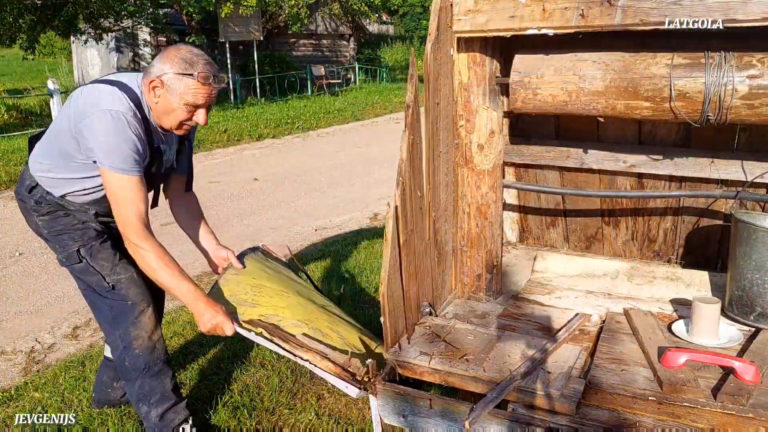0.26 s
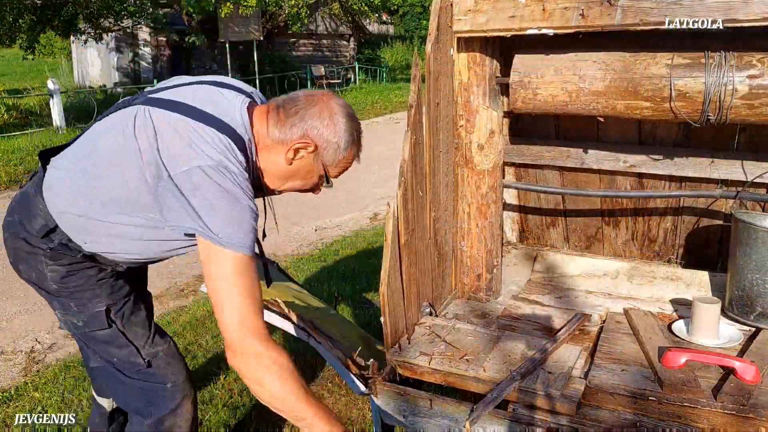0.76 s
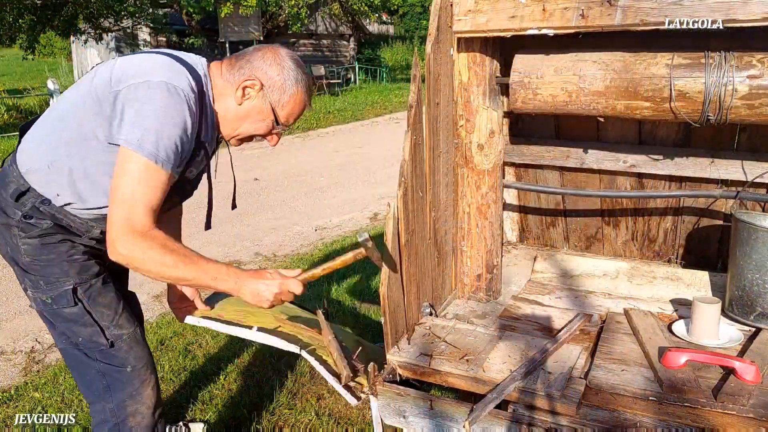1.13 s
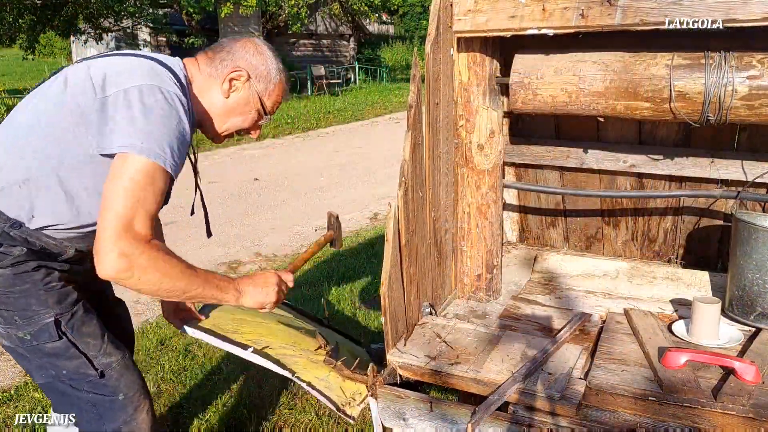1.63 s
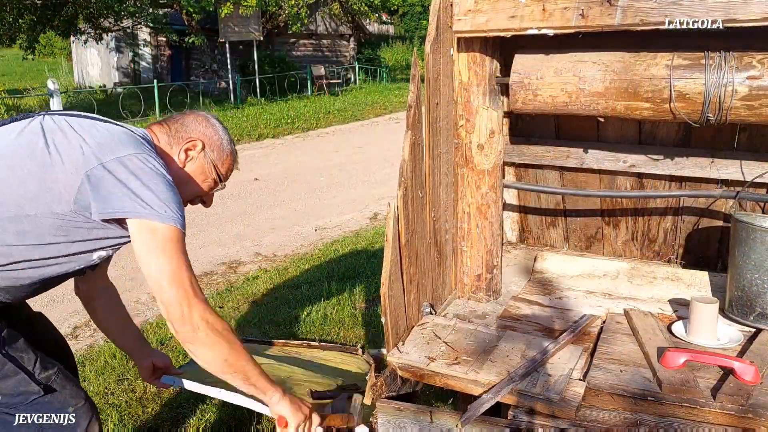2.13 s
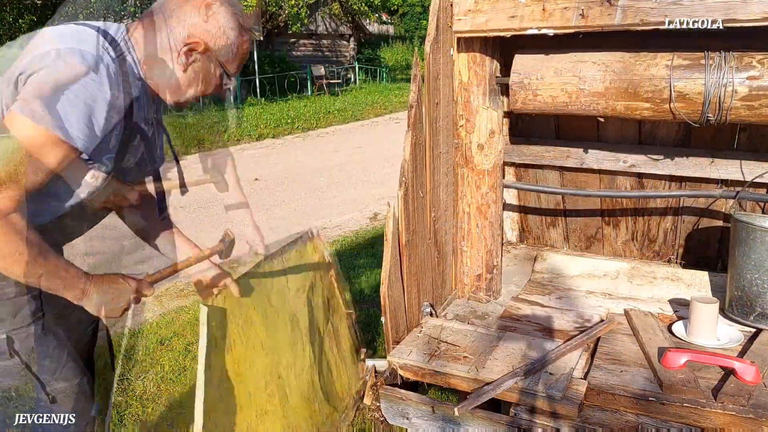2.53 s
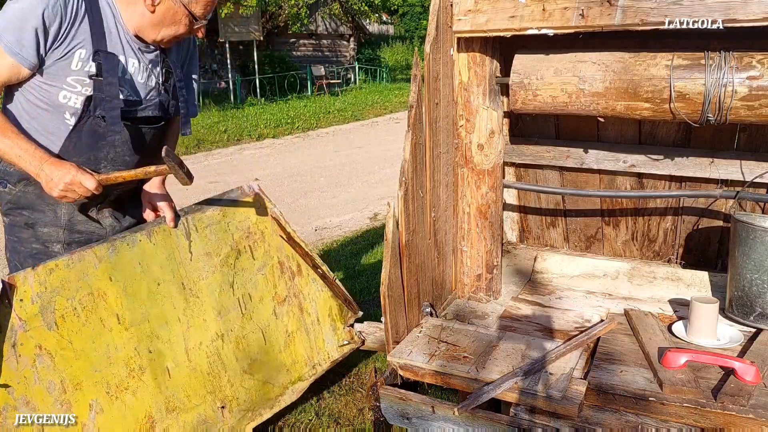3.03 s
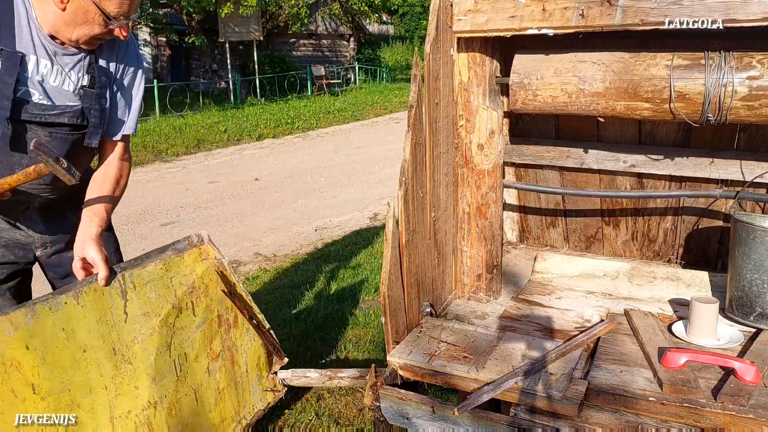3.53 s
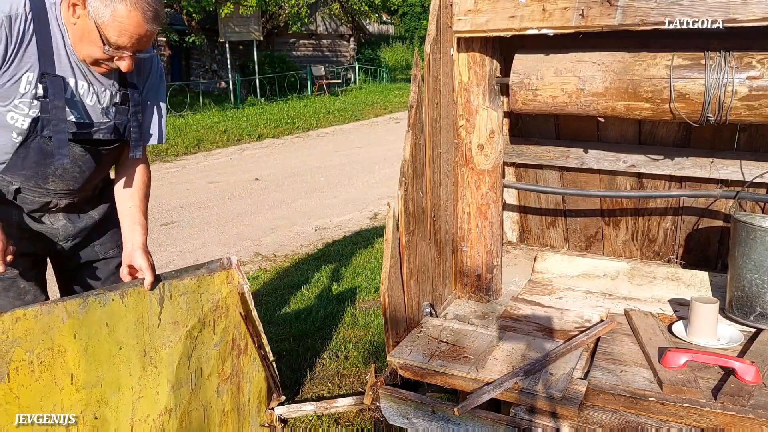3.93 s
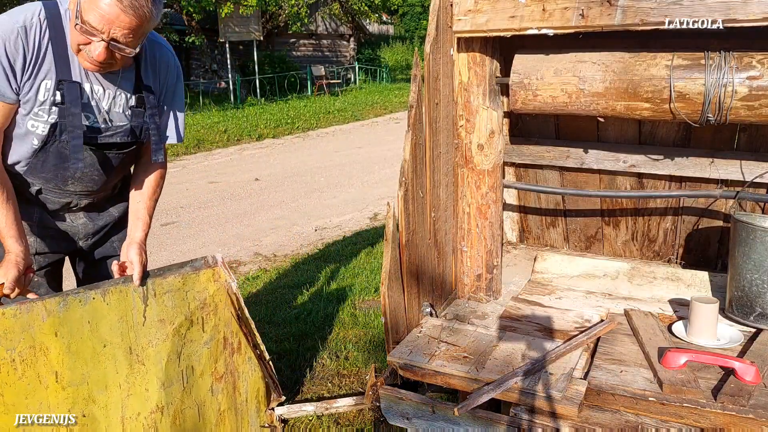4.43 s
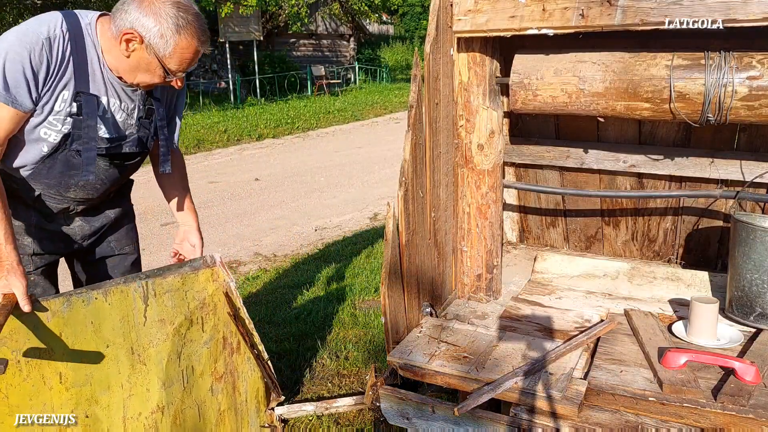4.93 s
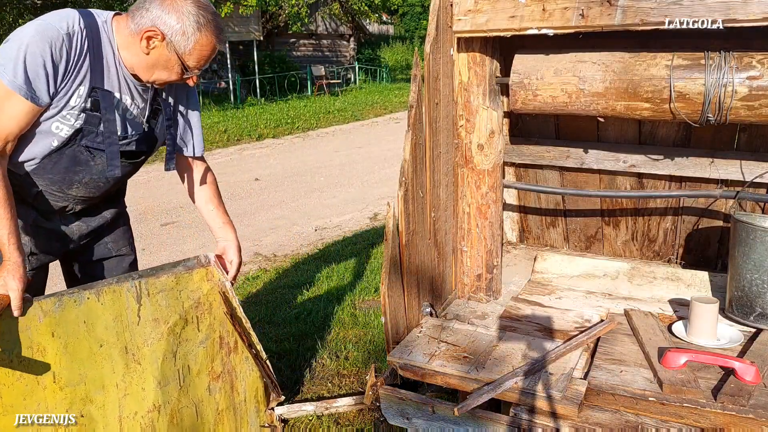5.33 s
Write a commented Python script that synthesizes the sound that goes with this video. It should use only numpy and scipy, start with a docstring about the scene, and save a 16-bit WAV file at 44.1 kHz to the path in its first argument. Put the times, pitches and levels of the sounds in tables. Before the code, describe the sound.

Sharp, dry hammer blows on loose wood, a big hollow break, scraping and bumping of a freed panel, then near quiet with faint hiss.

```python
"""A hammer knocks splintered boards off a thin wooden panel, which breaks free and is dragged and set down.
Each knock cracks and rattles loose wood (banded collision grains) and rings the panel (decaying modes).
Grain noise also makes the drag, a high hiss whose level throbs, and a brush of grass; a faint yard murmur
is band-shaped noise. Two microphone ports hear it, less alike toward the treble."""
import sys
import numpy as np
from scipy import signal
from scipy.fft import rfft, irfft, next_fast_len
from scipy.io import wavfile
from scipy.ndimage import uniform_filter1d

SR = 44100
rng = np.random.default_rng(int(sys.argv[2]) if len(sys.argv) > 2 else 0)


def transcribe(signal):
    """Save signal, clipped to [-1, 1], as a 16-bit WAV file at the path in sys.argv[1]."""
    frames = np.atleast_2d(signal).T
    limited = np.clip(frames, -1, 1)
    pcm = np.round(limited * 32767).astype(np.int16)
    wavfile.write(sys.argv[1], SR, pcm)


N = 245617
T = np.arange(N) / SR
FREE_S = 2.32  # the panel leaves its frame
CONTACT_S = 0.0022  # hammer contact at 0 dB hardness

# Hammer knocks: start_s, peak_db, hardness_db (treble), bass_db, rattle_t60_s (at 500 Hz), left_minus_right_db
KNOCK_ROWS = [(0.022, -17, -10, 6, 0.28, -3), (0.046, -21, 13, -12, 0.17, 0),
              (0.117, -24.5, -5, -18, 0.096, -4), (0.165, -14, 2, 1, 0.3, -0.5),
              (0.181, -18.5, 17, -43, 0.2, -4), (0.19, -11, 9, -24, 0.078, 1),
              (0.209, -4.5, 7, -5, 0.091, -2), (0.308, -28.5, 6.5, -25, 0.092, -1),
              (0.333, -10.5, -9.5, -1, 0.13, -2.5), (0.34, -15.5, -9, -18, 0.16, 2),
              (0.513, -33.5, -26, 16, 0.22, -4), (0.638, -44.5, 4.5, -24.5, 0.16, 0),
              (0.772, -61, -8, -8.5, 0.22, 1.5), (1.001, -53, -3.5, 8, 0.25, 6.5),
              (1.124, -7.5, 1.5, 2, 0.15, -1.5), (1.135, -4.5, -4.5, -27, 0.2, -3),
              (1.23, -24, 0.1, -16, 0.28, -1), (1.317, -1.5, 8, -35, 0.15, -1.5),
              (1.403, -24, 8, -22, 0.069, 2), (1.428, -23.5, -7, -25, 0.083, -3),
              (1.49, -0.5, 7, -15.5, 0.15, -1), (1.589, -33.5, -0.5, 1.5, 0.25, 0.5),
              (1.863, -3.5, 4, -1, 0.19, -1.5), (1.921, -22, 4.5, -3, 0.2, 1),
              (2.032, -5.5, 10.5, 3, 0.2, -1), (2.143, -23, -8, -29, 0.11, -1.5),
              (2.238, -3, 11, -63, 0.2, -1), (2.298, -14.5, 5, -34, 0.1, -1.5),
              (2.345, -16.5, -10.5, -35, 0.39, 0), (2.404, -25, -2, -23, 0.57, 1),
              (2.465, -9, 18, 11.5, 0.18, -0.5), (2.473, 1.5, 6.5, -8.5, 0.52, -3),
              (2.489, -14, 15.5, -16, 0.55, 10), (2.549, -8.5, -12, -32, 0.75, -1),
              (2.767, -23, -1.5, 1, 1, -0.5), (2.857, -22, -51, 4.5, 1, -2.5),
              (2.949, -39.5, -72, 17.5, 0.54, 0), (3.07, -30, -7, -24, 0.25, -3),
              (3.097, -36.5, 15, -31, 0.4, 2), (3.186, -29, -21, -17, 0.076, 1),
              (3.223, -14, 8, -38, 0.44, 0.5), (3.435, -28, 9, -3, 1, 0),
              (3.502, -20, -10, -28, 0.54, -0.5), (3.602, -32, 5, 23, 0.16, -2),
              (3.666, -37, 13, -1, 0.079, 1), (3.706, -10, 3.5, -35, 0.057, 0.5),
              (3.74, -8.5, -18, -25, 0.39, -1.5), (3.815, -12, -1, -22, 0.25, -1.5),
              (3.846, -24.5, 14.5, -4, 0.39, 3), (3.914, -12.5, -6, -29, 0.39, -2),
              (3.971, -21, -11, -27, 0.18, 1), (3.997, -19.5, 4.5, -35, 1, 0.5),
              (4.39, -25.5, 11, -17, 0.41, 2.5), (4.406, -19.5, 7.5, 7, 0.5, -0.5),
              (4.424, -17, -24, -27, 0.49, -2), (4.5, -22.5, -8, -21, 0.5, 0),
              (4.63, -32, -3, -23, 0.52, 0), (5.03, -58.5, -4.5, -4.5, 0.42, -1.5),
              (5.296, -56.5, -20.5, 14.5, 0.33, 0.5)]
# Wood shivering and dragging between knocks: start_s, relative_level_db, brightness_db_per_octave
DRAG_ROWS = [(0.0, -56, -2.5), (0.22, -49, -3), (0.46, -50.5, -5.5), (0.71, -73.5, -4.5),
             (0.98, -90.5, -0.5), (1.06, -51, -7.5), (1.35, -45, -4), (1.58, -76, 3), (1.88, -73.5, -5.5),
             (1.98, -44, -6.5), (2.25, -57, -1), (2.42, -31, -4), (2.5, -40, -0.5), (2.62, -29, -3.5),
             (2.85, -45, -1.5), (3.18, -47, -4), (3.29, -39.5, -4), (3.41, -44, -3.5), (3.57, -35.5, -7),
             (3.77, -33, -3), (3.88, -28.5, -6.5), (3.99, -27.5, -3), (4.16, -36.5, -12), (4.4, -60, -21),
             (4.56, -38.5, -5), (4.87, -67, -5), (5.3, -79, -2), (5.32, -55.5, -6.5), (5.47, -65.5, -7.5),
             (5.57, -68.5, -3)]


def undb(db):
    """Decibels to amplitude."""
    return 10 ** (np.asarray(db) / 20)


def pan(left_minus_right_db):
    """Split a level difference evenly into left and right dB rows."""
    return np.outer([0.5, -0.5], left_minus_right_db)


def on_log(table, hz, column=1):
    """Read a table column on a log-frequency axis."""
    table = np.array(table)
    return np.interp(np.log(hz), np.log(table[:, 0]), table[:, column])


def curves(table):
    """Columns of (s, value, ..) rows, sample by sample."""
    s, *columns = np.transpose(table)
    return [np.interp(T, s, c) for c in columns]


def band(x, hz, octaves):
    """Band of unit power with a raised-cosine shape; neighbours one width apart add up flat."""
    size = next_fast_len(N)
    bin_hz = np.maximum(np.arange(size // 2 + 1) * SR / size, 1)
    place = np.log2(bin_hz / hz) / octaves
    gain = np.cos(np.pi / 2 * np.clip(place, -1, 1)) ** 2
    y = irfft(rfft(x, size) * gain, size)[..., :N]
    return y / np.sqrt(np.mean(y ** 2))


def grains(rate_hz, scatter_db):
    """Shared and opposed streams of tiny collisions of very uneven size."""
    hit = rng.random((2, N)) < rate_hz / SR
    size_db = scatter_db * rng.exponential(size=(2, N))
    return hit * rng.standard_normal((2, N)) * undb(size_db)


def stereo(pair, hz):
    """Shared and opposed parts to left and right; the treble is less alike at the two ports."""
    # Likeness of the ports: frequency_hz, left_right_correlation
    alike = [(100, .99), (500, .93), (1200, .64), (3000, .52), (8000, .35), (14000, .1)]
    c = np.clip(on_log(alike, hz), 0, 1)
    shared = np.sqrt(1 + c) * pair[0]
    opposed = np.sqrt(1 - c) * pair[1] * np.array([[1], [-1]])
    return (shared + opposed) / np.sqrt(2)


def shape(t, t60_s, contact_s):
    """Rise over the contact time, with exponential decay."""
    t = np.maximum(t, 0)
    rise = np.sin(np.pi / 2 * np.minimum(t / max(contact_s, 1 / SR), 1)) ** 2
    return rise * np.exp(-np.log(1000) * t / t60_s)


def window(s):
    """Samples around an event, and their times from it."""
    part = slice(max(int((s - 0.03) * SR), 0), min(int((s + 0.5) * SR), N))
    return part, T[part] - s


def stutter(rate_hz):
    """Random levels held 1 / rate_hz s and slewed: friction grips and slips."""
    k = int(SR / rate_hz)
    steps = np.repeat(rng.standard_normal(N // k + 1), k)
    return uniform_filter1d(steps, k // 2)[:N]


def rattle(chatter):
    """Loose wood: a crack and a dying rattle at each knock, a drag between them; the treble dies first."""
    # Rattle spectrum: frequency_hz, density_db_per_hz
    colour = [(45, -16), (90, -10), (200, -1.5), (500, -5), (1000, -3.5), (2000, -12), (4000, -25),
              (8000, -32.5), (15000, -18.5)]
    # Frame holds the slowest flexing still; loose panel differs: frequency_hz, framed_db, freed_db
    frame_gain = [(50, -12.5, 3.5), (100, -3.4, 3.5), (194, 1, -2), (400, -2, -0.5), (800, -0.3, -0.4),
                  (1620, -0.8, 0), (3180, -0.52, -3.2)]
    top_db, top_growth = -11.5, 0.45  # top end; dB per dB of knock
    lead_db, lead_growth, freed_lead_db = -23.5, 0.26, -3.5  # against peak; extra dB per dB of knock
    lead_s = 0.018  # hiss swelling just ahead of a knock
    snap_db, snap_growth = -14.5, 0.2  # against peak; extra dB per dB of knock
    crack_db, tail_db = -14.5, -19.0  # against peak
    halving_db = 14  # hardness that halves the contact time
    framed_drag_hz, freed_drag_hz, drag_bass_db = 246, 400, -13  # fullest bands; bass against them

    out = np.zeros((2, N))
    freed = T > FREE_S
    level_db, bright_db = curves(DRAG_ROWS)
    for hz in 50 * 2 ** np.arange(0, 8.6, 0.5):
        power = np.zeros((2, N))
        treble = np.clip(np.log2(hz / 1000) / 1.8, 0, 1)
        bass = np.clip(np.log2(250 / hz) / 0.27, 0, 1)
        top = np.clip(np.log2(hz / 6000) / 1.2, 0, 1)
        colour_db = on_log(colour, hz) + 10 * np.log10(hz / 500)  # band width grows with pitch
        for s, db, hardness_db, bass_db, t60_s, pan_db in KNOCK_ROWS:
            part, t = window(s)
            treble_db = treble * hardness_db * (1 - top) + top * (top_db - (1 - top_growth) * db)
            peak = undb(db + colour_db + treble_db + bass * bass_db + pan(pan_db))
            contact_s = CONTACT_S * 2 ** (-np.clip(hardness_db, -20, 20) / halving_db)

            lead_gain = undb(lead_db + lead_growth * db + (s > FREE_S) * freed_lead_db)
            lead = lead_gain * np.clip(1 + t / lead_s, 0, 1) ** 1.5 * (t < contact_s)
            crack = undb(crack_db) * shape(t, 0.016 + 0.099 * t60_s + 3 / hz, contact_s)
            tail_t60_s = max(t60_s, 0.02) * (hz / 500) ** -0.2
            tail = undb(tail_db) * shape(t, tail_t60_s, contact_s)
            power[:, part] += peak ** 2 * (lead ** 2 + crack ** 2 + tail ** 2)

            # snap: a few cycles in every band at once, from full contact
            after = t - contact_s
            snap = np.sin(2 * np.pi * hz * after) * shape(after, 0.0015 + 4.0 / hz, 1.5 / hz)
            out[:, part] += peak * undb(snap_db + snap_growth * db) * snap

        octaves = np.where(freed, np.log2(hz / freed_drag_hz), np.log2(hz / framed_drag_hz))
        drag_db = level_db + bright_db * np.clip(octaves, 0, 3.7)
        drag_db = drag_db + drag_bass_db * np.clip(-octaves / 1.8, 0, 1)
        edge_db = 5 + 14 * max(np.log2(hz / 5000), 0) + 14 * max(np.log2(70 / hz), 0)
        power += undb(drag_db - edge_db + pan(-1.2)) ** 2

        gain_db = np.where(freed, on_log(frame_gain, hz, 2), on_log(frame_gain, hz, 1))
        out += undb(gain_db) * np.sqrt(power) * stereo(band(chatter, hz, 0.49), hz)
    return out


def panel(chatter):
    """Every knock rings the panel's modes in new shares, as it lands elsewhere; the drag shakes them too."""
    # Panel modes: frequency_hz, relative_level_db, t60_s (before damping)
    modes = [(138, -7.5, 0.16), (236, 0, 0.25), (264, -8.5, .2), (293, -5, 0.21), (418, -4.5, 0.04),
             (420, -3, 0.089), (484.7, 1, 0.087), (596, -6, 0.05), (695, -12, 0.28), (776, -10.5, 0.2),
             (848, -4.5, 0.14), (910, -6, 0.075), (1285, -18.5, 0.033), (1370, -10.5, 0.12),
             (1548, -6.5, 0.22), (1630, -9.5, 0.25), (2027, 2, 0.093), (2140, -12.5, 0.034),
             (2320, -20.5, 0.12), (3356, -14.5, 0.12), (3920, -16.5, .05)]
    # Mode change off the frame: frequency_hz, change_db
    freed_change = [(130, 1), (234, -11), (415, -2.5), (600, -0.5), (1200, -9), (4000, 11.5)]
    ring_db, freed_ring_db = -8, 2  # against peak; extra once freed
    ring_tilt_db = -19  # hardness offset: duller than the rattle
    framed_sustain, freed_sustain = 0.4, 0.7  # t60 factors: the frame damps the panel
    hum_db, hum_sustain = -14.5, 0.95  # against drag level; t60 factor

    out = np.zeros((2, N))
    hz, mode_db, mode_t60_s = (c[:, None] for c in np.transpose(modes))
    chance = rng.standard_normal((len(KNOCK_ROWS), 3, len(modes), 1))
    for (s, db, hardness_db, _, _, pan_db), (share, detune, side) in zip(KNOCK_ROWS, chance):
        part, t = window(s)
        freed = s > FREE_S
        # a softer contact leaves high modes out
        soft_db = (hardness_db + ring_tilt_db) * np.clip(np.log2(hz / 600) / 3.5, 0, 1)
        share_db = 5.1 * (abs(share) - 1.92)
        gain = np.sign(share) * undb(mode_db + freed * on_log(freed_change, hz) + soft_db + share_db)
        sustain = freed_sustain if freed else framed_sustain
        tone = np.sin(2 * np.pi * hz * (1 + 0.015 * detune) * t)
        ring = gain * tone * shape(t, sustain * mode_t60_s, CONTACT_S)
        spread = 0.3 * side * np.sqrt(hz / 1000)
        pair = np.array([(ring * (1 + spread)).sum(axis=0), (ring * (1 - spread)).sum(axis=0)])
        out[:, part] += pair * undb(db + ring_db + freed * freed_ring_db + pan(pan_db))

    drag_db = curves(DRAG_ROWS)[0]
    for f, db, t60_s in modes[:8]:  # only the low modes sing under a drag
        r = np.exp(-np.log(1000) / (hum_sustain * t60_s * SR))
        resonator = [1, -2 * r * np.cos(2 * np.pi * f / SR), r * r]
        hum = signal.lfilter([1], resonator, stereo(chatter, f))
        change_db = (T > FREE_S) * on_log(freed_change, f)
        out += hum / hum.std() * undb(db + change_db + drag_db + hum_db)
    # a thin panel radiates little below its lowest mode
    return signal.sosfilt(signal.butter(2, 90, "highpass", fs=SR, output="sos"), out)


def rustle():
    """Dry blades of grass brush the wood as the panel settles: one swell of banded grains."""
    start_s, level_db, attack_s, t60_s = 4.5, -52, 0.012, 0.42
    blades = band(grains(5000, scatter_db=2.5), 3600, 0.8)
    return undb(level_db) * shape(T - start_s, t60_s, attack_s) * stereo(blades, 4070)


def insects():
    """A high insect-like hiss of banded grains; its level throbs 43 times a second, more deeply later on."""
    # Hiss sinks under the hammering and returns: start_s, relative_level_db, left_minus_right_db
    levels = [(0.0, -56.5, 0.5), (0.96, -55, -5), (1.35, -57, -1.8), (1.66, -65.5, 1.2), (1.91, -61, -0.5),
              (2.29, -60.5, 1.1), (2.44, -49, -1.5), (2.81, -52, 0.7), (4.09, -56, -4.5), (5.57, -53, -4.5)]
    # Hiss bands: centre_hz, width_octaves, relative_level_db
    bands = [(10000, .3, -24), (11700, .22, -11), (13400, .2, -1), (15200, .2, -1)]
    # Level throb: start_s, depth_ratio
    throb = [(2.4, 0.05), (3.0, .5), (4.3, 1)]
    throb_hz = 43.07
    level_db, pan_db = curves(levels)
    beat = np.exp(0.24 * (np.cos(2 * np.pi * (throb_hz * T - 0.8)) - 1))
    hiss = np.zeros((2, N))
    for hz, octaves, db in bands:
        grit = band(grains(14000, scatter_db=3.0), hz, octaves)
        hiss += undb(db) * stereo(grit, hz)
    return hiss * (1 + curves(throb)[0] * (beat - 0.3)) * undb(level_db + pan(pan_db))


def yard():
    """Faint open-air murmur of leaves and far traffic: steady noise in octave-spaced bands."""
    # Murmur spectrum: centre_hz, level_db (per band)
    murmur = [(50, -93), (100, -84), (200, -86), (400, -90.5), (800, -85.5), (1600, -88), (3200, -90),
              (6400, -81)]
    air = rng.standard_normal((2, N))
    return sum(undb(db) * stereo(band(air, hz, 0.91), hz) for hz, db in murmur)


def scene():
    """Sum the layers; the freed wood reaches the left port a few samples early."""
    # Left-port delay, negative is early as the panel moves left: start_s, delay_samples
    left_late = [(2.9, -1), (3.1, -10)]
    chatter = grains(12000, scatter_db=2.0) * undb(2.2 * stutter(70))
    wood = rattle(chatter) + panel(chatter)
    samples = np.arange(N)
    wood[0] = np.interp(samples - curves(left_late)[0], samples, wood[0])
    return wood + rustle() + insects() + yard()


def record(dry):
    """The microphone drops the deep bass; the recorder rounds the loudest peaks and cuts the top."""
    top_hz, ceiling = 15750, 1.05
    heard = signal.sosfilt(signal.butter(4, 48, "highpass", fs=SR, output="sos"), dry)
    rounded = ceiling * np.tanh(heard / ceiling)
    return signal.sosfilt(signal.ellip(12, 0.2, 95, top_hz, fs=SR, output="sos"), rounded)


dry = scene()
out = record(dry)
transcribe(out)
```